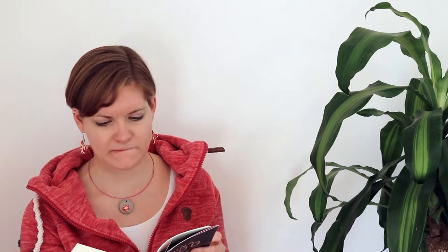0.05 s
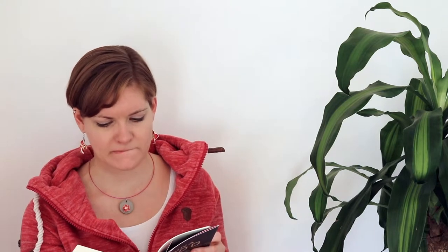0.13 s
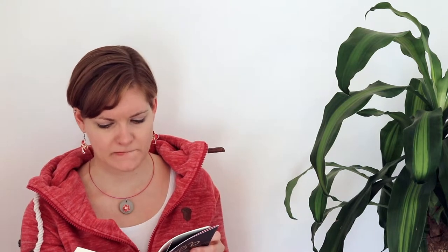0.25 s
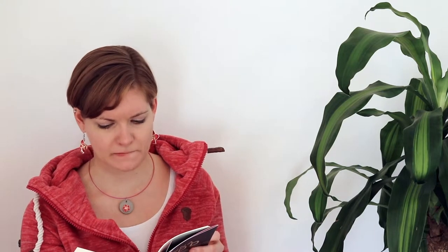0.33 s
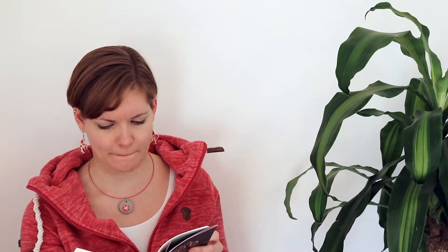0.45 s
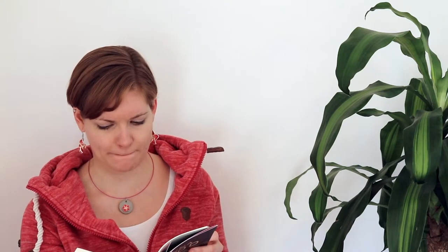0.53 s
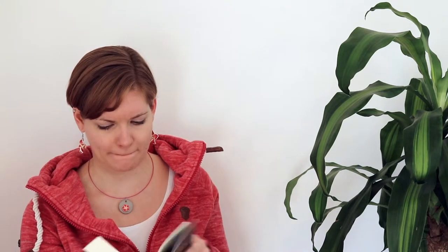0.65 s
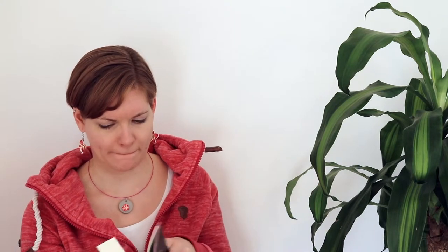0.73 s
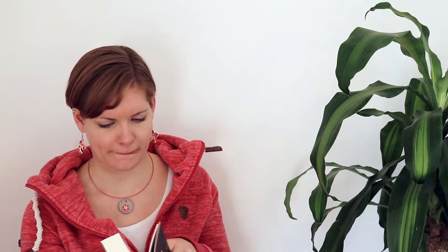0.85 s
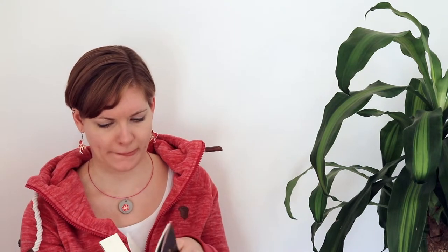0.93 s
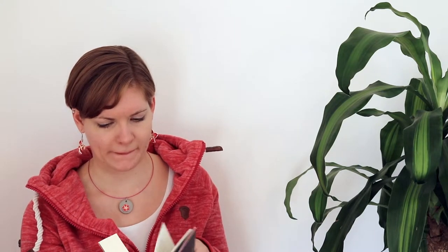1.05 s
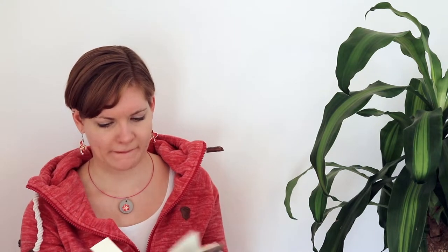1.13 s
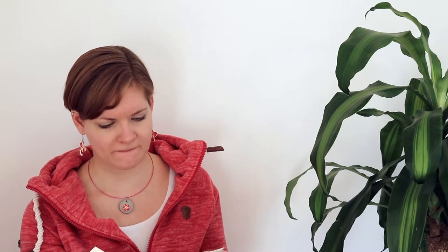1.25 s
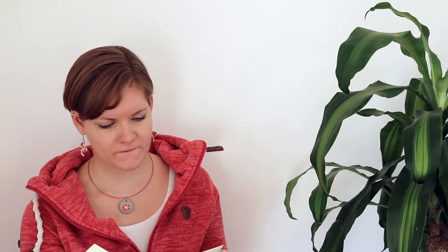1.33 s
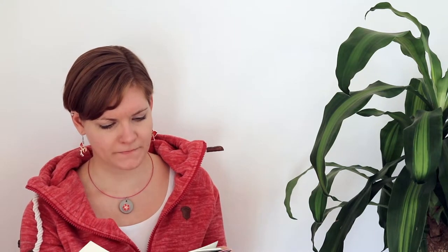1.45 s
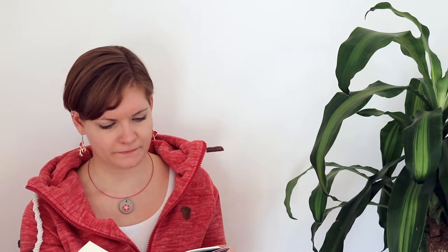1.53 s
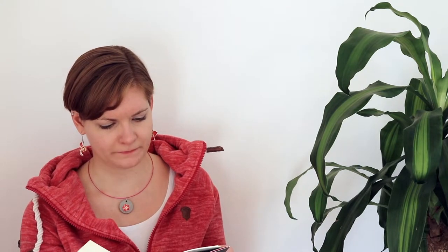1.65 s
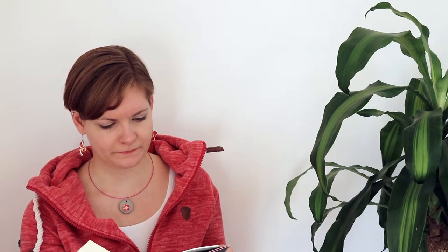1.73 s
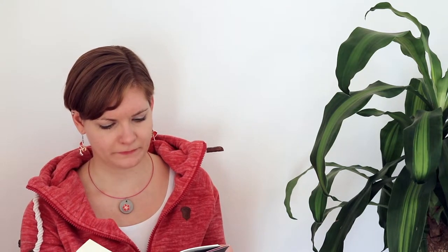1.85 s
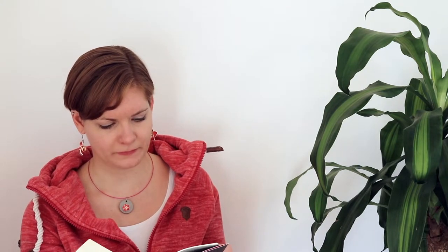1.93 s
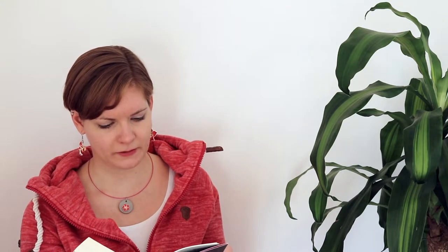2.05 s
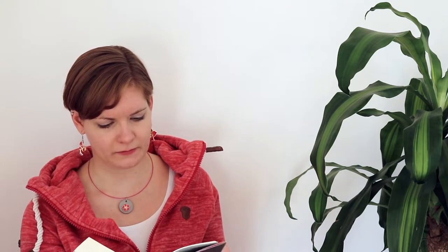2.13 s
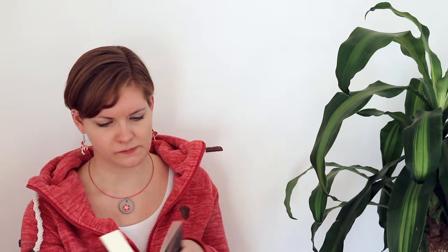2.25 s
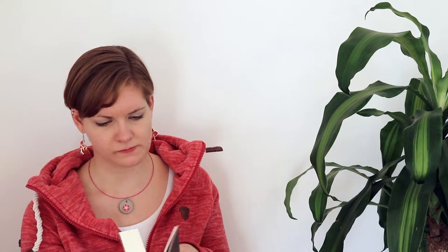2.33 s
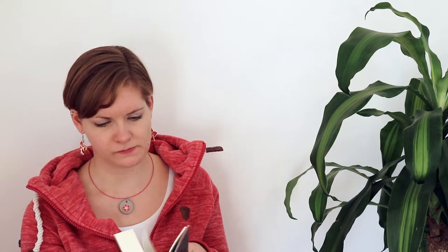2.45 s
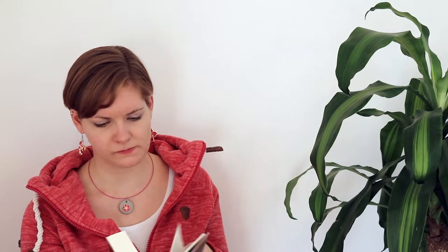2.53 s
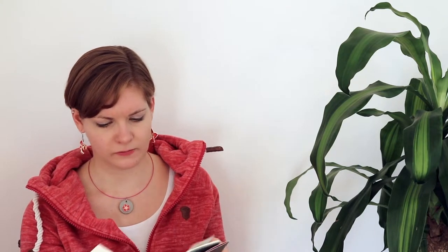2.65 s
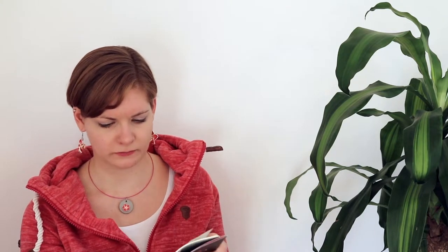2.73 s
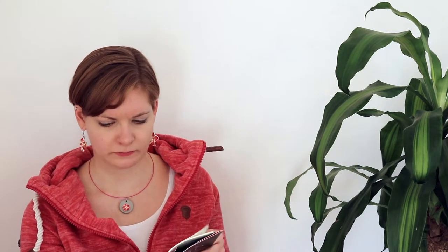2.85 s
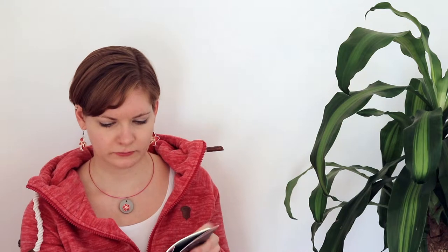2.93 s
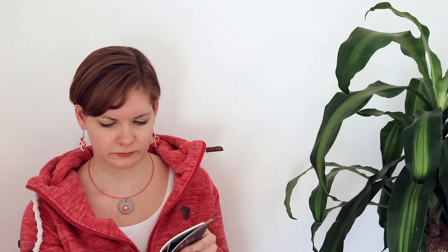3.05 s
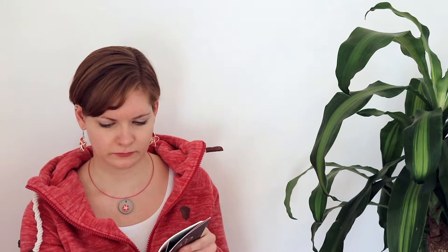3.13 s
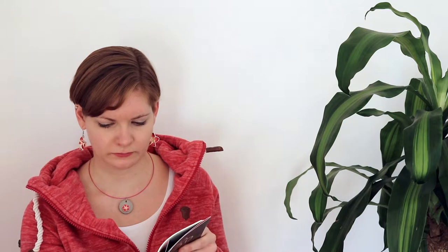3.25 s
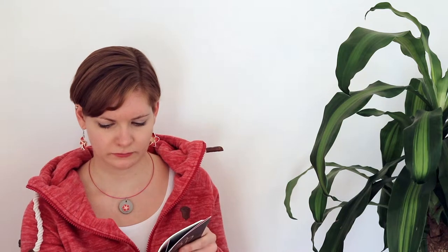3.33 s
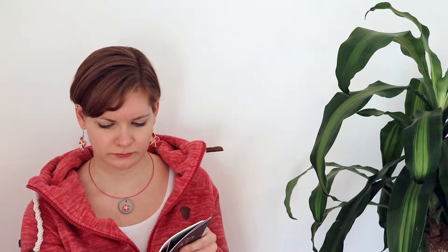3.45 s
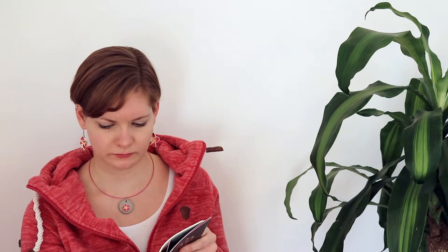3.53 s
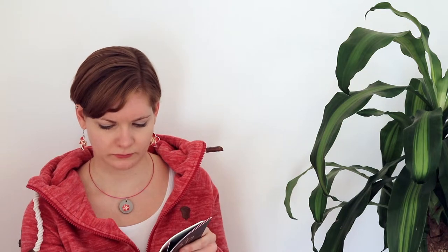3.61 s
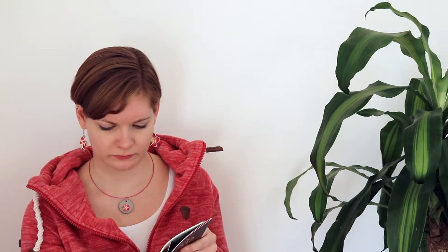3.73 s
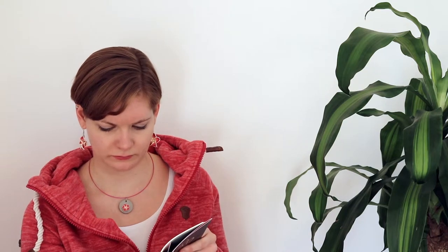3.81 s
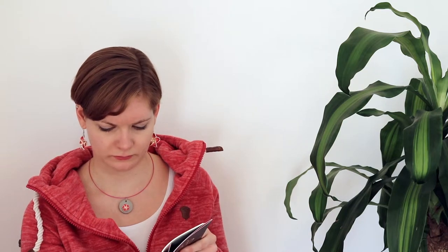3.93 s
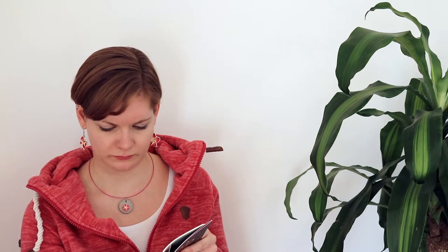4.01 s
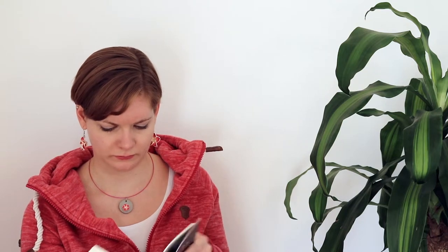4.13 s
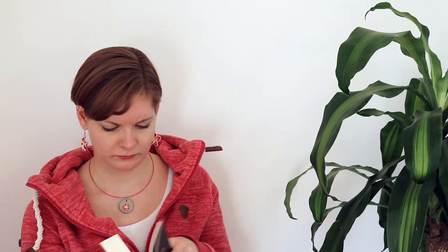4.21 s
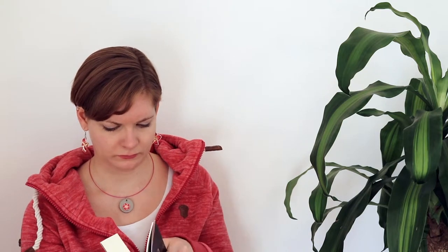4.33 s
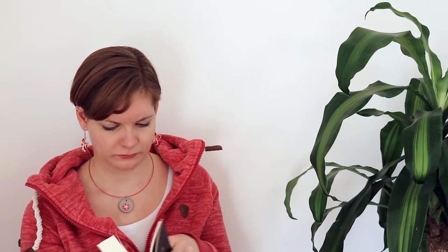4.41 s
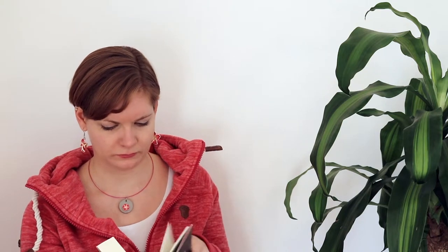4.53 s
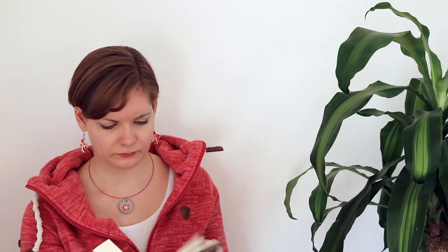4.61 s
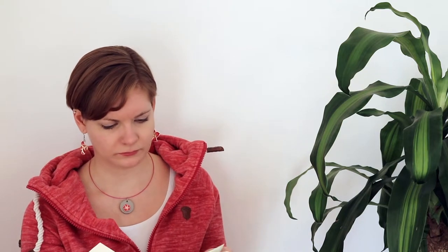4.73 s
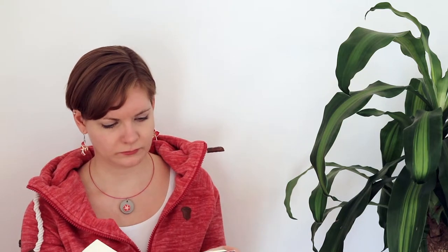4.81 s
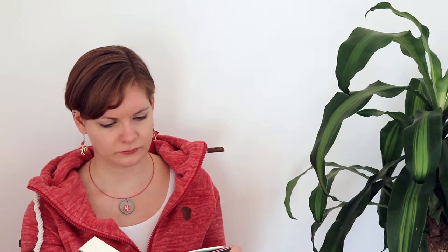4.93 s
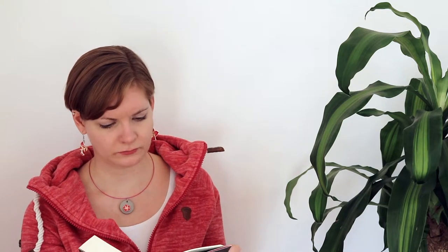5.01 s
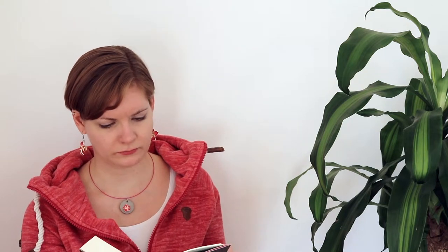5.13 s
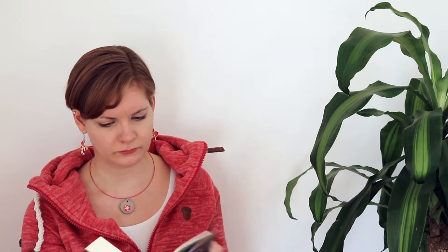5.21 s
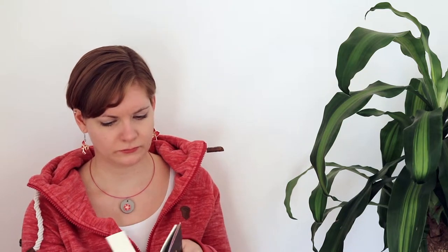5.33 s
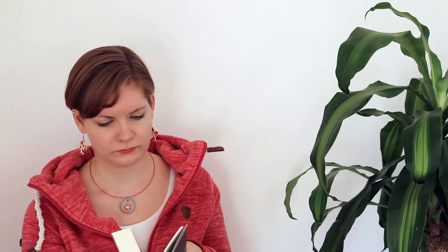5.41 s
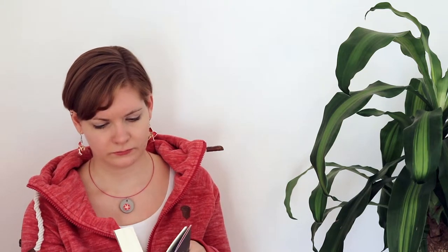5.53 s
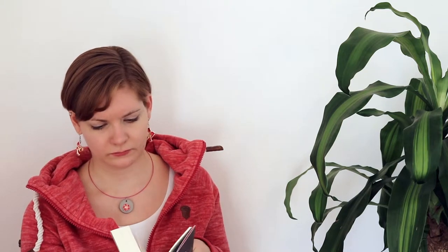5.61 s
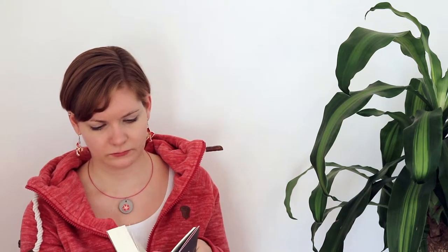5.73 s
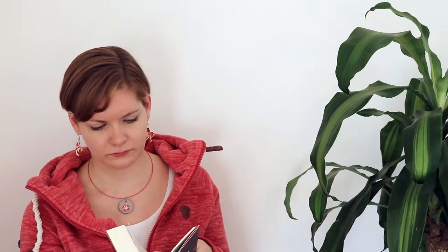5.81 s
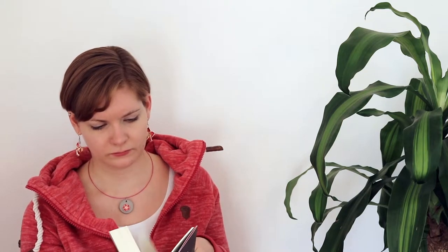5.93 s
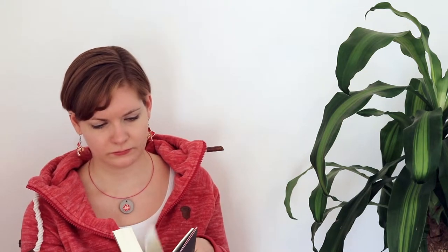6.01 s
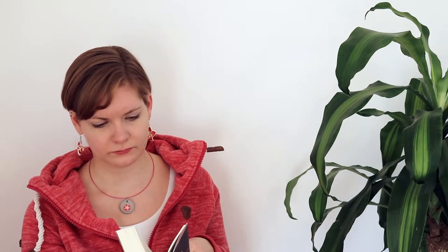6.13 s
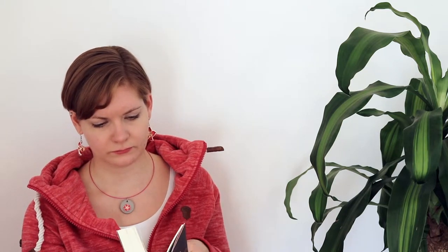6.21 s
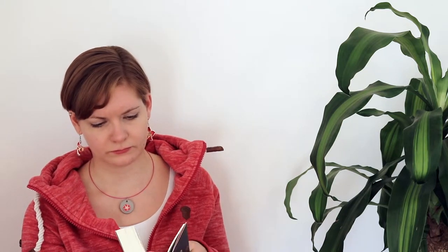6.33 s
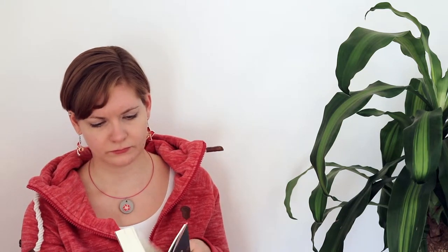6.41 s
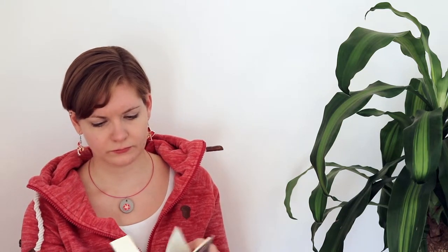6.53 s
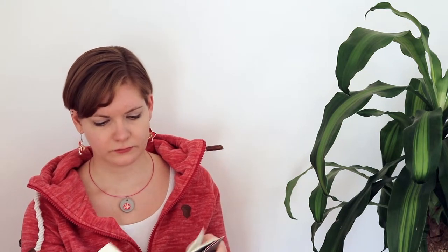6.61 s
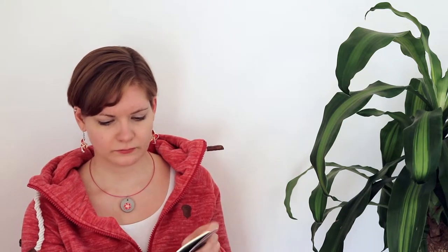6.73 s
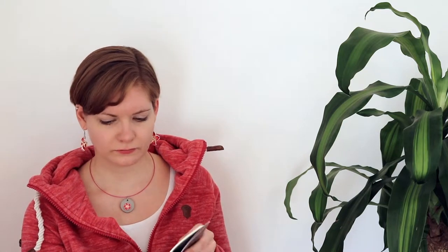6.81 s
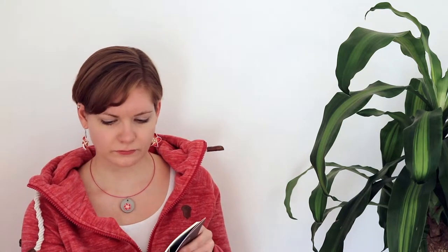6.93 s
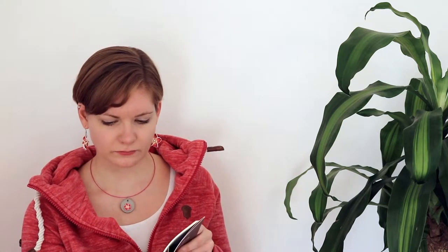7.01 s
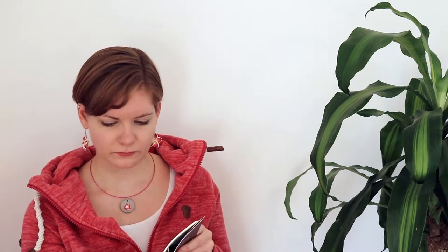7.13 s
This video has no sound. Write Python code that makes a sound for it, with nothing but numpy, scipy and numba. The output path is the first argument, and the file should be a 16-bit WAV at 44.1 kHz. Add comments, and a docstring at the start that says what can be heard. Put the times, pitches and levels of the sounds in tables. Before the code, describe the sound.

Close stereo sound of a paperback leafed through in a small room with a short, soft reverberation. Around 0.7 s a faint bent-paper pop, light rub and dull cover bump. At 1.05-1.3 s crisp page-edge ticks and a brushing slide, then a tick and airy settling hiss near 1.5 s. Quiet until a faint brush at 2.25 s and a soft bump; at 2.55-2.9 s a bright flick, rustles, a pop and a landing sheet. Another pause, a light rub and bump around 4.2 s, then a similar fuller turn at 4.5-4.85 s. Faint brushing at 5.3 s, tiny bumps at 5.8 s. At 6.03 s a hard, stiff paper snap, very short and by far the loudest, with small ticks after. A last bright flick, slides, stronger pops and airy settling at 6.5-6.75 s. Faint room hiss swells after rustles, slowly sinking.

```python
"""Someone leafs through a paperback in a small room, close to a stereo microphone.
First a bent sheet pops, paper is rubbed and a finger bumps the cover. Then edges tick by stick-slip, slipping off
the thumb or landing; sheets slide or are lightly brushed, buckle and settle with an airy hiss. Late on, after a
faint narrow burst of noise, a stiff sheet snaps, ringing its damped modes, and more pages turn. Throughout, the
recorder's expander lets the room hiss swell after the rustles and sink back slowly."""
import sys
import numpy as np
from scipy import signal
from scipy.fft import rfft, irfft, next_fast_len
from scipy.io import wavfile
from scipy.ndimage import uniform_filter1d
from numba import njit

SR = 44100
rng = np.random.default_rng(int(sys.argv[2]) if len(sys.argv) > 2 else 0)


def master(y):
    """Save y as 16-bit WAV."""
    cut = np.clip(np.atleast_2d(y).T, -1, 1)
    pcm = np.round(cut * 32767)  # scale
    wavfile.write(sys.argv[1], SR, pcm.astype(np.int16))


N = 315742
TIME = np.arange(N) / SR  # s
FREQ = np.maximum(np.fft.rfftfreq(2 ** 12, 1 / SR), 1)  # Hz

# short bright ticks of page edges, slipping off the thumb or landing:
# start_s, rise_s, hold_s, level_db, air_db, ring_hz
FLICK_STROKES = [(1.057, 0.0047, .008, -38, 9, 9600), (1.078, 0.011, 0.01, -36, -13, 5340),
                 (1.535, 0.0061, 0.0018, -44, 19, 5260), (2.552, 0.013, 0.016, -32.5, -4.5, 8200),
                 (4.536, .01, 0.01, -32, 1.5, 10000), (5.34, 0.0049, .002, -52.5, -13, 6500),
                 (6.044, .007, .002, -41.5, -8, 13000), (6.154, 0.0059, 0.0074, -41.5, 3, 7900),
                 (6.49, 0.013, 0.011, -32, 9, 7260)]
# paper rubbed: sheets dragged over their neighbours, and light brushes of finger or sheet:
# start_s, rise_s, hold_s, level_db, air_db, ring_hz
RUB_STROKES = [(0.709, 0.033, 0.017, -57, -17, 3000), (1.174, 0.015, 0.038, -39.5, 0.5, 5160),
               (1.227, 0.02, 0.017, -41.5, 8, 6600), (2.265, 0.0087, 0.016, -48.5, 7, 6400),
               (2.605, 0.047, 0.036, -50.5, -15, 5600), (2.667, .011, 0.017, -39.5, 8, 4470),
               (2.707, 0.027, .008, -46, 10, 10400), (4.175, 0.052, 0.0068, -47, -3, 6000),
               (4.63, 0.05, 0.01, -42, -3, 5240), (4.705, 0.034, 0.015, -40.5, 8, 5100),
               (5.262, 0.027, 0.026, -51, 6, 7000), (6.581, 0.031, 0.024, -39.5, 0, 5130),
               (6.629, 0.018, 0.031, -39, 4, 6500)]
# the sheet skimming down onto the stack: start_s, rise_s, hold_s, level_db, air_db, ring_hz
SETTLE_STROKES = [(1.454, 0.015, 0.044, -41.5, 2.5, 12800), (2.862, 0.06, 0.013, -42, 1.5, 12300),
                  (4.79, 0.073, 0.016, -41, 11, 11300), (6.714, 0.047, 0.023, -39.5, 4, 10400)]
# a faint narrow burst of noise near 2500 Hz just before the snap:
# start_s, rise_s, hold_s, level_db, air_db, ring_hz
NARROW_BURSTS = [(6.011, .003, .002, -44, -12, 2500)]
# the bent sheet popping over: start_s, level_db, tilt_db_per_octave
BUCKLE_POPS = [(0.667, -48, -3), (1.085, -47.5, -15.5), (2.600, -50, -10.5), (2.841, -41.5, -1),
               (4.75, -38.5, -3), (5.811, -53.5, 0.5), (6.508, -33.5, -1.5), (6.694, -32.5, 4)]
# fingers bumping the cover: start_s, level_db
COVER_BUMPS = [(0.849, -55.5), (2.375, -52), (4.314, -46.5), (5.346, -57), (5.810, -48.5), (6.009, -42.5),
               (6.029, -37.5), (6.509, -41.5)]
# modes of the held cover: pitch_hz, level_db, t60_s
COVER_MODES = [(306, -13, 0.052), (500, -21, 0.054), (575, -6, 0.059), (664, -2.5, 0.045),
               (853, -12.5, 0.071), (1043, -13.5, 0.071), (1630, -7, 0.021), (2660, -3.5, .015),
               (3420, -3, 0.011)]
# a stiff sheet snapping through: start_s, level_db
SHEET_SNAPS = [(6.0287, -9.5), (6.0535, -30)]
# modes of the taut sheet: pitch_hz, level_db, t60_s
SHEET_MODES = [(1590, -3.5, 0.03), (1650, -18, 0.06), (1757, -16.5, 0.052), (1960, -8, 0.011),
               (2440, 1, 0.0029), (3200, -15, 0.01), (3550, -24.5, 0.073), (5150, -8, 0.0029),
               (6000, -21, 0.019), (6600, -14.5, 0.024)]
# spectrum of the page-edge ticks: frequency_hz, gain_db
FLICK_SPECTRUM = [(200, -48), (900, -40), (1300, -27), (1900, -19.5), (2380, -8.5), (2850, -13), (3300, 3),
                  (3750, 1.5), (4300, 1), (5200, 4.5), (7500, 4.5), (11000, -4.5), (13500, -12),
                  (15500, -16)]
# spectrum of rubbed paper: frequency_hz, gain_db
RUB_SPECTRUM = [(200, -63), (900, -16), (1300, -24), (1900, -17), (2380, -13.5), (2850, -9), (3300, -2.5),
                (3750, -8), (4300, -0.5), (5200, 2), (7500, -1), (11000, -7.5), (13500, -12), (15500, -20)]
# spectrum of a sheet grazing the stack: frequency_hz, gain_db
SETTLE_SPECTRUM = [(200, -49), (900, -18), (1300, -18), (1900, -7.5), (2380, -15), (2850, -6), (3300, -10),
                   (3750, -14.5), (4300, -6), (5200, -3.5), (7500, -0.5), (11000, -3), (13500, -4),
                   (15500, -9.5)]
# spectrum of a buckling pop: frequency_hz, gain_db
BUCKLE_SPECTRUM = [(40, -87), (150, -36), (300, -29), (950, 3), (1220, -10), (1550, -0.5), (2000, -1),
                   (2500, 5), (3100, -8), (3700, -7.5), (5000, -9.5), (9000, -29), (15000, -31)]
# resonances and dips shared by the curled pages: centre_hz, width_hz, gain_db
CURL_RESONANCES = [(1950, 270, -3), (2400, 380, 5), (2880, 420, -1.5), (3705, 83, 7), (4320, 310, -4)]
# how differently the two sides hear the walls: frequency_hz, side_minus_mid_db
ROOM_SIDE_GAIN = [(200, -21), (700, -15), (1600, -16), (4000, -6), (9000, -10.5), (14000, -6)]
# the book's place between the two sides: frequency_hz, left_minus_right_db
STEREO_BALANCE = [(200, 1.5), (2400, 1.3), (8000, 0.5), (15000, 3.5)]
# spectrum of the room air and microphone hiss: frequency_hz, gain_db
HISS_SPECTRUM = [(15, -60), (25, -40), (70, -19), (113, -11.5), (165, -7), (189, -2.5), (228, -4),
                 (284, -2), (316, 0), (392, -2.5), (500, -1.5), (1090, -4), (1390, -6), (1510, -4.5),
                 (15800, -18.5)]
# how differently the two sides hear the hiss: frequency_hz, side_minus_mid_db
HISS_SIDE_GAIN = [(60, -6), (200, -3), (700, -2), (2400, -2), (15000, -2)]

# each tick is led by a soft creeping rustle
CREEP_LEAD_S, CREEP_RISE_S, CREEP_HOLD_S, CREEP_DB = 0.04, 0.018, 0.004, -20
# after each rub the paper trails on faintly
TRAIL_RISE_S, TRAIL_HOLD_S, TRAIL_DB = 0.013, 0.086, -17.5
# the settling sheet is heard faintly as it glides in
GLIDE_LEAD_S, GLIDE_HOLD_S, GLIDE_DB = 0.059, 0.022, -14.5
ATTACK_POWER = 1.2  # a stroke gathers speed slowly at first
SAG_DB_PER_S = 37  # a held stroke loses pressure
BUCKLE_DECAY_S = 0.0084
HISS_DB = -70.5  # mid level with the expander fully closed
EXPANDER_DEPTH_DB = 10.5
TOP_HZ = 15800


def undb(db):
    """Level definition: decibels to amplitude gain."""
    return 10 ** (np.asarray(db) / 20)


def unit(x):
    """Normalisation: scale to rms 1."""
    return x / np.sqrt(np.mean(x ** 2))


def read(points, hz=FREQ):
    """Interpolation: join spectrum points on a log-frequency axis."""
    at_hz, db = np.transpose(points)
    return np.interp(np.log(hz), np.log(at_hz), db)


def response(db):
    """Minimum phase: fold the cepstrum to get a causal, unit-energy impulse response with this gain over FREQ."""
    cepstrum = irfft(np.log(undb(db)))
    cepstrum[1:len(FREQ) - 1] *= 2
    cepstrum[len(FREQ):] = 0
    impulse = irfft(np.exp(rfft(cepstrum)))[:2048]
    return impulse / np.linalg.norm(impulse)


def colour(x, points, share=1):
    """Linear filtering: weight a whole track's spectrum by a share of the points' decibels."""
    size = next_fast_len(N)
    hz = np.maximum(np.fft.rfftfreq(size, 1 / SR), 1)
    gain = undb(share * read(points, hz))
    return irfft(rfft(x, size) * gain, size)[:N]


def add(track, start_s, sound):
    """Superposition: mix a sound into the track at its start."""
    i = int(start_s * SR)
    track[i:i + len(sound)] += sound[:N - i]


def flutter(rate_hz, size):
    """Random modulation: straight lines between random knots, rate_hz knots per second."""
    knots = rng.standard_normal(1024)
    return np.interp(TIME[:size] * rate_hz, np.arange(len(knots)), knots)


def stroke_speed(t, rise_s, hold_s, fall_s):
    """Stroke kinematics: gather speed, sag while held, then stop along a Gaussian fall."""
    held = np.maximum(t - rise_s, 0)
    attack = np.minimum(t / rise_s, 1) ** ATTACK_POWER
    sag = undb(-SAG_DB_PER_S * held)
    fall = np.exp(-(np.maximum(held - hold_s, 0) / fall_s) ** 2)
    return attack * sag * fall


def friction(strokes, spectrum, fall_s, body_db, air_db, ring_db, grain_db, catch_db, catch_hz,
             ripple_db, shift_hz, count=3):
    """Stick-slip: fibres catch and let go in spurts of dense tiny slips that ring the sheet at count patches.

    body_db and air_db are (start, end) pairs: the colour moves from one to the other as the page travels."""
    out, t = np.zeros(N), TIME[:SR // 3]
    # a wide free sheet radiates body; a thin grazing edge radiates air
    body = 1 / (1 + (FREQ / 4300) ** 6)
    air = 1 / (1 + (9200 / FREQ) ** 7)
    curl_db = sum(db * np.exp(-((FREQ - hz) / width) ** 2) for hz, width, db in CURL_RESONANCES)
    paper_db = read(spectrum) + curl_db
    for start_s, rise_s, hold_s, level_db, edge_db, ring_hz in strokes:
        speed = stroke_speed(t, rise_s, hold_s, fall_s)
        # the curled page rings at a pitch set by its bend
        ring = np.exp(-((FREQ / ring_hz - 1) / 0.083) ** 2)
        travel = np.sin(np.pi / 2 * np.minimum(t / (rise_s + hold_s + fall_s), 1)) ** 2
        # pressure wanders from patch to patch
        pressure = undb(10 * np.array([flutter(shift_hz, len(t)) for _ in range(count)]))
        spurts = unit(undb(catch_db * flutter(catch_hz, len(t))))
        for share in pressure / np.linalg.norm(pressure, axis=0):
            grains = np.repeat(rng.standard_normal(len(t)), 8)[:len(t)]  # each lasts 8 samples
            slips = unit(rng.standard_normal(len(t)) * undb(grain_db * grains))
            # each patch favours its own set of the sheet's many modes
            modes = np.interp(FREQ, np.linspace(0, SR / 2, 80), rng.standard_normal(80))
            for weight, low_db, high_db in zip((1 - travel, travel), body_db, air_db):
                radiation_db = low_db * body + (high_db + edge_db) * air
                sheet_db = paper_db + ring_db * ring + radiation_db + ripple_db * modes
                force = slips * spurts * share * speed * weight
                add(out, start_s, undb(level_db) * signal.fftconvolve(force, response(sheet_db)))
    return out


def flicks():
    """Stick-slip at an edge: a soft creeping rustle leads each bright tick, which starts thin and grows fuller."""
    creeps = [(start_s - CREEP_LEAD_S, CREEP_RISE_S, CREEP_HOLD_S, level_db + CREEP_DB, *tone)
              for start_s, _, _, level_db, *tone in FLICK_STROKES]
    creeping = friction(creeps, FLICK_SPECTRUM, fall_s=0.019, body_db=(3, 0), air_db=(-7, -5), ring_db=2,
                        grain_db=3.5, catch_db=3.0, catch_hz=246, ripple_db=3.5, shift_hz=40)
    ticks = friction(FLICK_STROKES, FLICK_SPECTRUM, fall_s=0.01, body_db=(-14, 6), air_db=(6, -4),
                     ring_db=3.5, grain_db=3.0, catch_db=2.0, catch_hz=365, ripple_db=3.0, shift_hz=51.5)
    return creeping + ticks


def rubs():
    """Sliding friction: drags and light brushes grow airier as they go, and the paper trails on faintly."""
    strokes = friction(RUB_STROKES, RUB_SPECTRUM, fall_s=0.021, body_db=(5, 4), air_db=(-3, 7), ring_db=3,
                       grain_db=0.3, catch_db=3.3, catch_hz=232, ripple_db=3.0, shift_hz=45.0)
    followers = [(start_s + rise_s + hold_s, TRAIL_RISE_S, TRAIL_HOLD_S, level_db + TRAIL_DB, *tone)
                 for start_s, rise_s, hold_s, level_db, *tone in RUB_STROKES]
    trails = friction(followers, RUB_SPECTRUM, fall_s=0.15, body_db=(13, 12), air_db=(-7, -2), ring_db=3.0,
                      grain_db=4.5, catch_db=-3.0, catch_hz=194, ripple_db=1.5, shift_hz=39)
    return strokes + trails


def settles():
    """Grazing contact: the sheet glides in faintly, skims the stack with an airy hiss and comes to rest."""
    glides = [(start_s - GLIDE_LEAD_S, GLIDE_LEAD_S, GLIDE_HOLD_S, level_db + GLIDE_DB, *tone)
              for start_s, _, _, level_db, *tone in SETTLE_STROKES]
    return friction(SETTLE_STROKES + glides, SETTLE_SPECTRUM, fall_s=0.012, body_db=(7, 3), air_db=(3, 6),
                    ring_db=4.5, grain_db=4.5, catch_db=2.5, catch_hz=216, ripple_db=3.5, shift_hz=30.3)


def narrow_bursts():
    """Resonant filtering: a strong peak narrows a faint burst of noise to near 2500 Hz just before the snap."""
    return friction(NARROW_BURSTS, FLICK_SPECTRUM, fall_s=0.014, body_db=(20, 20), air_db=(0, 0), ring_db=18,
                    grain_db=1.5, catch_db=1.0, catch_hz=300, ripple_db=2.5, shift_hz=40)


def buckles():
    """Snap-through buckling: a bent sheet flips its curve with a short crumpling pop of decaying noise."""
    out, t = np.zeros(N), TIME[:SR // 5]
    for start_s, level_db, tilt_db in BUCKLE_POPS:
        burst = rng.standard_normal(len(t)) * np.exp(-t / BUCKLE_DECAY_S)
        # the tilt levels off below about 400 Hz
        pop_db = read(BUCKLE_SPECTRUM) + tilt_db * np.log2(FREQ + 400)
        add(out, start_s, undb(level_db) * signal.fftconvolve(burst, response(pop_db)))
    return out


def knocks(blows, modes, low_hz, high_hz):
    """Modal synthesis: each blow rings the same damped sines; a band-pass keeps them between low_hz and high_hz."""
    out, t = np.zeros(N), TIME[:SR // 4]
    ring = sum(undb(level_db) * np.exp(-np.log(1000) * t / t60_s) * np.sin(2 * np.pi * pitch_hz * t)
               for pitch_hz, level_db, t60_s in modes)
    for start_s, level_db in blows:
        add(out, start_s, undb(level_db) * ring)
    band = signal.butter(6, [low_hz, high_hz], "band", fs=SR, output="sos")
    return signal.sosfilt(band, out)


def snaps():
    """Impulse excitation: the stiff sheet snaps through and rings its taut modes."""
    return knocks(SHEET_SNAPS, SHEET_MODES, low_hz=1690, high_hz=6240)


def bumps():
    """Impact excitation: fingers bump the held cover and ring its modes."""
    return knocks(COVER_BUMPS, COVER_MODES, low_hz=270, high_hz=4560)


def room(x, wet_db, t60_low, t60_high, gap_s):
    """Reverberation: near walls answer within milliseconds; crossed microphones hear the tail partly alike."""
    t = TIME[:SR // 2]
    # bass and treble, parted at 900 Hz, die away at their own rates (t60 in s)
    low, high = (signal.sosfilt(signal.butter(2, 900, kind, fs=SR, output="sos"),
                                rng.standard_normal((2, len(t)))) for kind in ("low", "high"))
    tails = low * np.exp(-np.log(1000) * t / t60_low) + high * np.exp(-np.log(1000) * t / t60_high)
    tails = tails * np.minimum(t / gap_s, 1) ** 2
    mid, side = (signal.fftconvolve(x, undb(wet_db) * tail / np.linalg.norm(tail))[:N] for tail in tails)
    side = colour(side, ROOM_SIDE_GAIN)
    # the book lies a little to the left, most clearly in the highest treble
    return np.array([colour(x + mid + sign * side, STEREO_BALANCE, sign / 2) for sign in (1, -1)])


def hiss():
    """Partly coherent noise: still room air and microphone hiss, more alike on both sides in the bass."""
    mid, side = (unit(colour(rng.standard_normal(N), HISS_SPECTRUM)) for _ in range(2))
    side = colour(side, HISS_SIDE_GAIN)
    # raised here by the depth that the closed expander takes away
    return undb(HISS_DB + EXPANDER_DEPTH_DB) * np.array([mid + side, mid - side])


def scene():
    """Superposition: the book's sounds in the room, over the hiss."""
    pages = flicks() + rubs() + settles() + narrow_bursts()
    blows = buckles() + bumps() + snaps()
    pages_in_room = room(pages, wet_db=-3.5, t60_low=0.33, t60_high=0.19, gap_s=0.00047)
    blows_in_room = room(blows, wet_db=-4.0, t60_low=0.32, t60_high=0.15, gap_s=0.0027)
    return pages_in_room + blows_in_room + hiss()


@njit
def follow(x, attack, release):
    """Envelope following: rise towards the input exponentially, sink by a fixed step per sample."""
    envelope, level = np.empty(len(x)), 0.
    for i in range(len(x)):
        if x[i] > level:
            level = level + (x[i] - level) * attack
        else:
            level = max(level - release, x[i])
        envelope[i] = level
    return envelope


def expander(x, threshold_db, knee_db, attack_s, release_db_per_s):
    """Downward expansion: quiet passages are turned down; rustles open the gain, which then sinks slowly."""
    power = np.maximum(uniform_filter1d(np.mean(x ** 2, axis=0), size=441), 1e-12)  # 10 ms mean
    opening = np.clip((10 * np.log10(power) - threshold_db) / knee_db, 0, 1)
    lift_db = follow(EXPANDER_DEPTH_DB * opening, 1 / (attack_s * SR), release_db_per_s / SR)
    return x * undb(lift_db - EXPANDER_DEPTH_DB)


def record(dry):
    """Dynamics and band limiting: the expander, then the recorder's top cut."""
    opened = expander(dry, threshold_db=-59.0, knee_db=8.0, attack_s=0.06, release_db_per_s=15.5)
    top_cut = signal.ellip(10, 0.2, 70, TOP_HZ, fs=SR, output="sos")
    return signal.sosfilt(top_cut, opened)


dry = scene()
out = record(dry)
master(out)
```